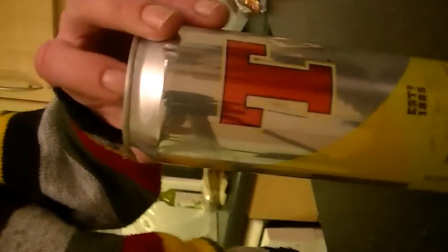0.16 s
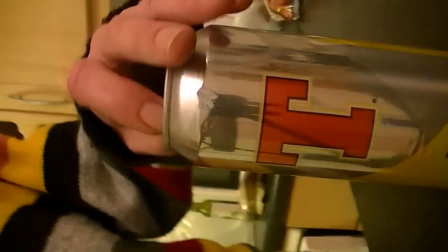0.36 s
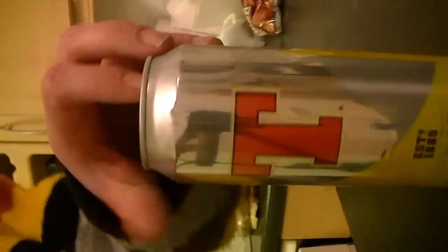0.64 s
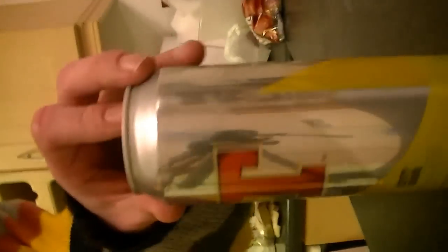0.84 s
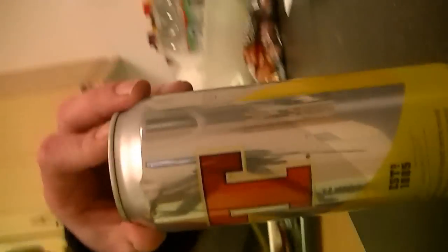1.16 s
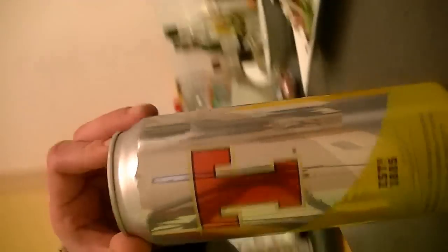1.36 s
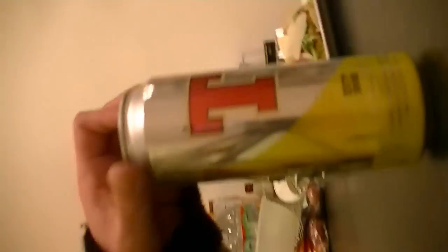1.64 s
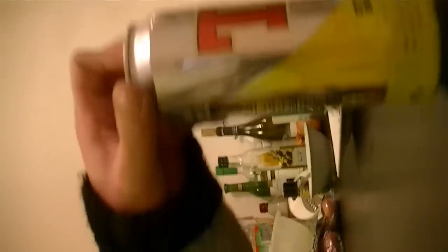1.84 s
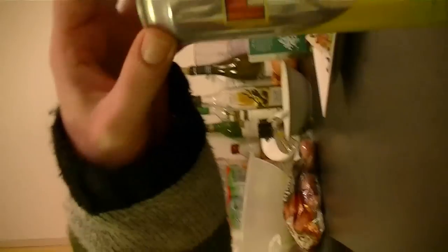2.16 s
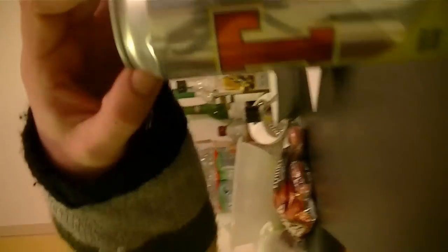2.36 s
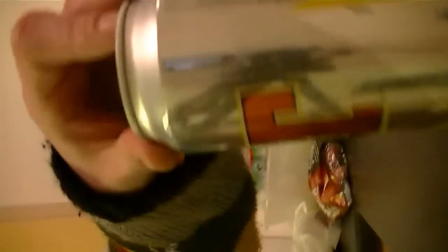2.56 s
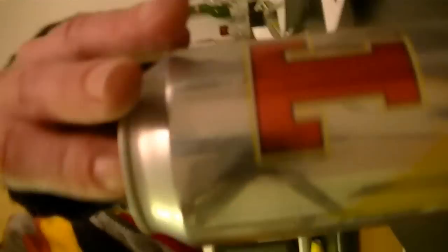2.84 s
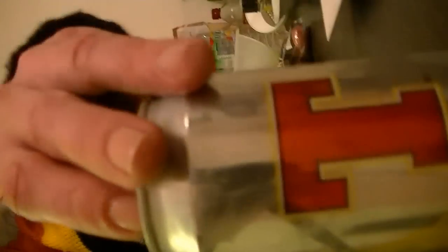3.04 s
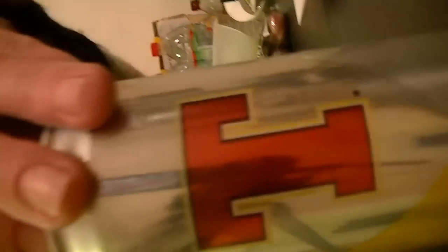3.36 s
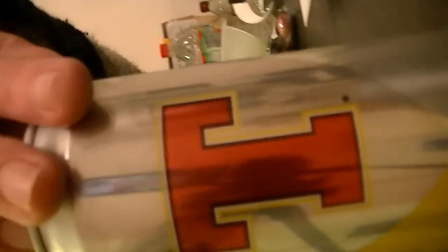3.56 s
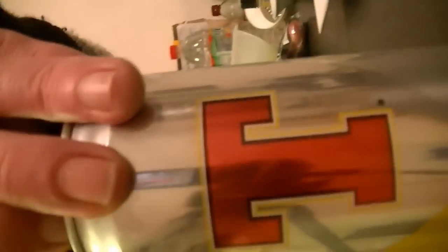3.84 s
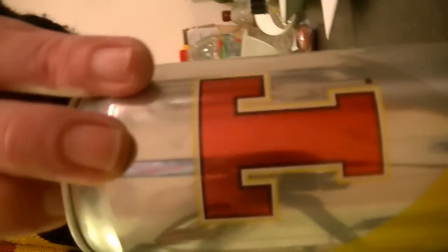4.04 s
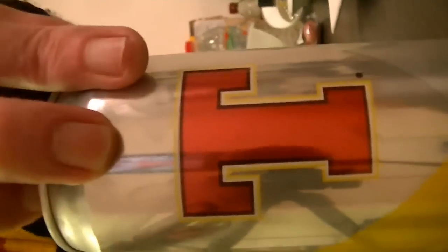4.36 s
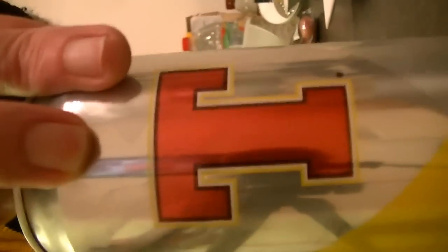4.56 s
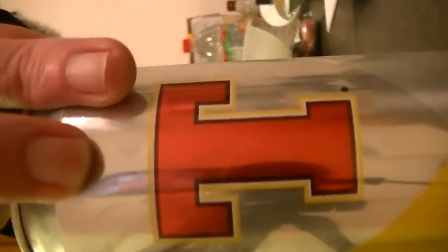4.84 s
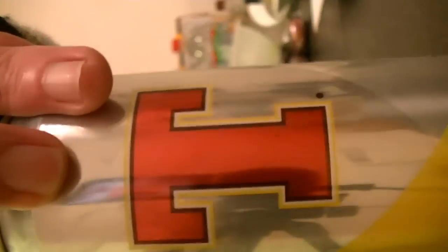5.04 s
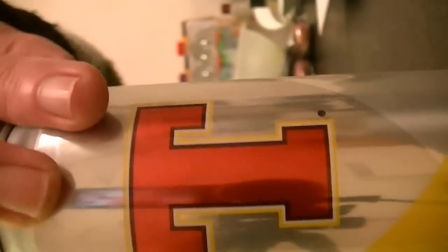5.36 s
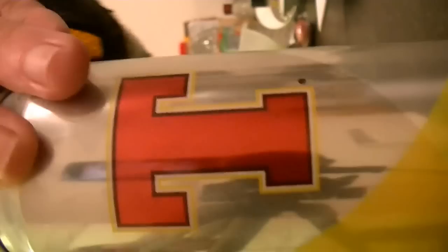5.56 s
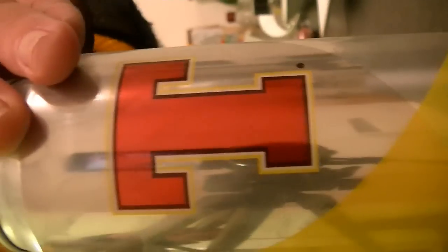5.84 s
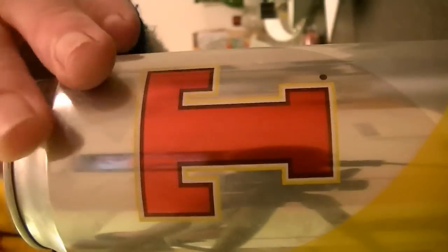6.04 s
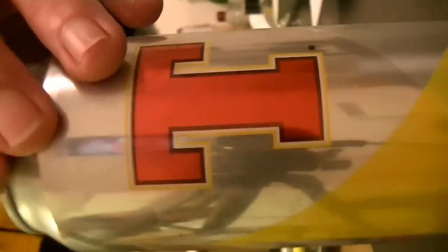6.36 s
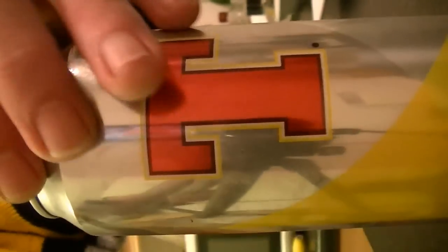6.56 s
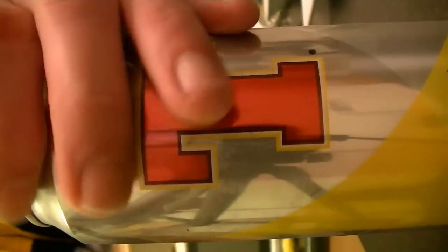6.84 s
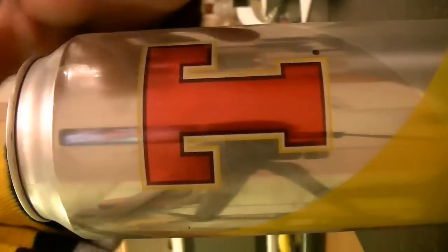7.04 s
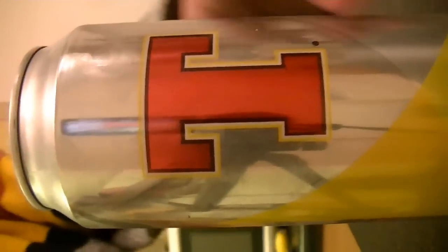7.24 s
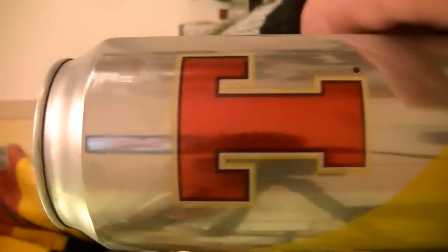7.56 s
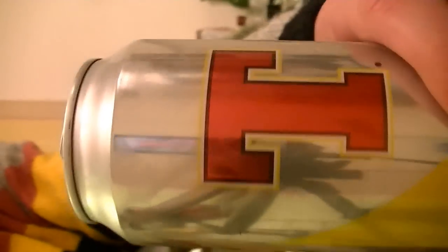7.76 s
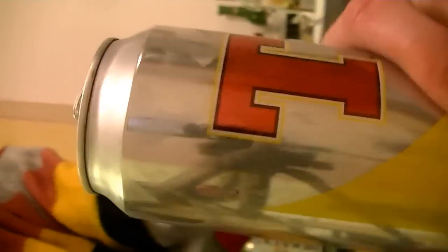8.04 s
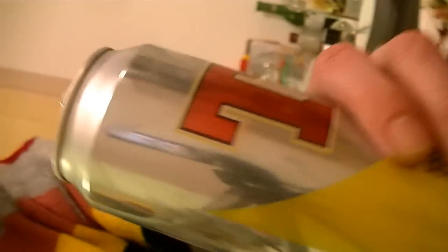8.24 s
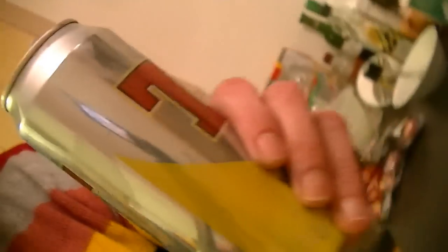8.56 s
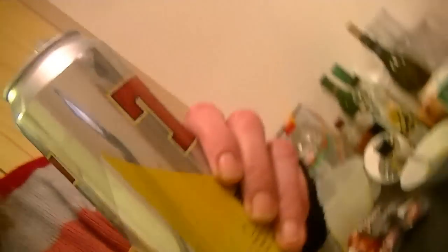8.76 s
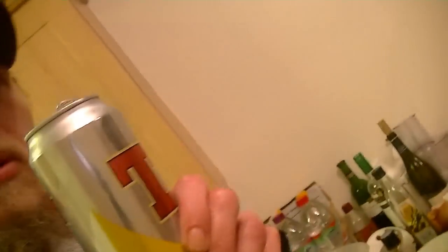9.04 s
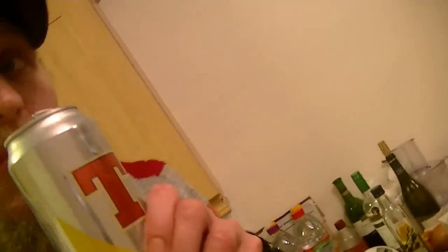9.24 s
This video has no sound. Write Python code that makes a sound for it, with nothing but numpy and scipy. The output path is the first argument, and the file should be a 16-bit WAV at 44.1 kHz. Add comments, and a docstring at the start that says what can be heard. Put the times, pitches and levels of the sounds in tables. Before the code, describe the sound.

A full aluminium drink can is tapped and turned in a hand, then cracks open with a short hiss and a sharp snap.

```python
"""A quiet kitchen: a full aluminium drink can is turned in one hand, close to the microphone.
Fingers tap, rub and grip it; the wall rings, and booms as it swings with the liquid.
The ring-pull cracks the seal, gas hisses out, the score line tears and the lid flap snaps in.
Both cracks overload the microphone. A few clicks and soft knocks follow."""
import sys
import numpy as np
from scipy import signal
from scipy.fft import rfft, irfft, next_fast_len
from scipy.io import wavfile
from scipy.ndimage import uniform_filter1d

SR = 44100
rng = np.random.default_rng(int(sys.argv[2]) if len(sys.argv) > 2 else 0)


def int16_out(signal):
    """Quantize to a 16-bit WAV file."""
    q = np.round(np.clip(np.atleast_2d(signal).T, -1, 1) * 32767)
    wavfile.write(sys.argv[1], SR, q.astype(np.int16))


N = 414099
TIME_S = np.arange(N) / SR
BAND_LIMIT_HZ = 16000

# wall swinging with the liquid: pitch_hz, level_db, t60_s
BOOM_MODES = [(279, 0, .21), (255, -10, .12), (338, -10, .18), (437, -11, .2)]
# wall of the full can: pitch_hz, level_db, t60_s
WALL_MODES = [(1125, -1, .25), (1165, -6, .2), (1745, -3, .26), (1938, 1, .16), (2230, -7, .16),
              (2350, -2, .16), (2430, -4, .17), (2830, -12, .15), (2920, -13, .14), (3310, -12, .16),
              (3950, -17, .15), (4140, -14, .15), (4430, -12, .16), (4660, -3, .15), (5210, -9, .17),
              (5950, -16, .14), (6790, -15, .12), (7780, -13, .12), (8690, -12, .12)]
# hollow of the can: pitch_hz, level_db, t60_s
HOLLOW_MODES = [(183, -14, .8), (221, -12, .6), (280, -4, .55), (443, -3, .8), (495, -3, .22),
                (678, -3, .25), (985, -1, .25)]
# thin shell's response to taps and clicks: freq_hz, gain_db
SHELL_SPECTRUM = [(300, 0), (550, 1.5), (900, 0), (2400, 2), (3400, -5), (4600, 1), (9000, 3), (14000, -3)]
# skin on metal: freq_hz, density_db
RUB_SPECTRUM = [(60, -22), (160, -3), (380, 5), (800, 0), (2500, -1), (3700, -7), (5200, -3), (9000, -10),
                (15000, -26)]


def amp(db):
    return 10 ** (np.asarray(db) / 20)


def unit_rms(x):
    return x / np.sqrt(np.mean(x ** 2) + 1e-20)


def curve_at(points, hz):
    """Linear interpolation over log frequency."""
    freq_hz, value = np.transpose(points)
    return np.interp(np.log(hz + 1), np.log(freq_hz + 1), value)


def cascade(first, second):
    """Two spectra in series."""
    hz = np.geomspace(40, BAND_LIMIT_HZ, 120)
    return np.transpose([hz, curve_at(first, hz) + curve_at(second, hz)])


def contact_spectrum(centre_hz, below_db_oct, above_db_oct):
    """A contact's spectrum falls away on both sides of its centre."""
    octaves = np.array([-6, 0, 6])
    return np.transpose([centre_hz * 2. ** octaves, octaves * [below_db_oct, 0, -above_db_oct]])


def excited(modes, spectrum, selectivity):
    """A contact favours the modes near its centre."""
    return [(hz, db + selectivity * curve_at(spectrum, hz), t60_s) for hz, db, t60_s in modes]


def add(mix, start_s, sound, room_db):
    """Adds a sound to the direct path (row 0) and the room send (row 1)."""
    part = mix[:, round(start_s * SR):][:, :len(sound)]
    part += np.outer([1, amp(room_db)], sound[:part.shape[1]])


def noise(spectrum, samples=N):
    """Steady shaped noise, rms 1."""
    size = next_fast_len(samples)
    gain = amp(curve_at(spectrum, np.fft.rfftfreq(size, 1 / SR)))
    return unit_rms(irfft(rfft(rng.standard_normal(size)) * gain, size)[:samples])


def wander(smooth_samples, samples=N):
    """Smoothed random drift, rms 1."""
    return unit_rms(uniform_filter1d(rng.standard_normal(samples), smooth_samples))


def envelope(start_s, level_db, attack_s, hold_s, t60_s):
    """Linear rise, hold, exponential decay."""
    t = TIME_S - start_s
    return np.clip(t / attack_s, 0, 1) * amp(level_db - 60 * np.maximum(t - attack_s - hold_s, 0) / t60_s)


def stream(level, spectrum, flutter_db, flutter_samples, room_db):
    """Fluttering noise, as direct path and room send."""
    sound = noise(spectrum) * level * amp(flutter_db * wander(flutter_samples))
    return np.outer([1, amp(room_db)], sound)


def burst(spectrum, level_db, t60_s, snap=0., rise_s=.0004, bass_hz=165, size=16384):
    """A blow into dense, damped modes: impulse plus dying noise. Level is energy spread over 5 ms."""
    t, hz = np.arange(size) / SR, abs(np.fft.fftfreq(size, 1 / SR))
    drive = rng.standard_normal(size) * amp(-60 * t / t60_s) * (1 - np.exp(-t / rise_s))
    bins = np.fft.fft(drive + snap * np.linalg.norm(drive) * (t == 0))
    bins /= np.sqrt(uniform_filter1d(abs(bins) ** 2, size=257, mode="wrap"))  # all bands driven alike
    radiation = hz ** 2 / np.hypot(hz ** 2, bass_hz ** 2)  # a small object radiates little bass
    log_gain = np.log(amp(curve_at(spectrum, hz)) * radiation + 1e-5)
    causal_filter = np.exp(np.conj(signal.hilbert(log_gain)))
    sound = np.fft.ifft(bins * causal_filter).real[:size * 3 // 4]
    return amp(level_db) * sound * np.sqrt(.005 * SR / np.sum(sound ** 2))


def ring(modes, level_db, rise_s, waver_rad, scatter_db=2.5, detune=.006):
    """Dying modes; the touch point varies their strength and pitch, the grip makes them waver."""
    hz, mode_db, t60_s = np.transpose(modes)[:, :, None]
    t = np.arange(SR * 3 // 4) / SR
    strength, pitch, phase = rng.standard_normal((3, len(modes), 1))
    waver = unit_rms(uniform_filter1d(rng.standard_normal((len(modes), len(t))), size=700, axis=1))
    gain = amp(mode_db + scatter_db * strength)
    angle_rad = 2 * np.pi * (hz * (1 + detune * pitch) * t + phase) + waver_rad * waver
    waves = gain * amp(-60 * t / t60_s) * np.sin(angle_rad)
    return amp(level_db) * waves.sum(0) * (1 - np.exp(-t / rise_s)) * 2 / np.linalg.norm(gain)


def room_tone(level_db=-63.3):
    """Steady kitchen background noise."""
    # background: freq_hz, density_db
    spectrum = [(20, -32), (50, -23), (100, -12), (200, -7), (320, -2), (520, -4), (900, -2), (1250, 0),
                (1650, -3), (2200, -8), (4000, -13), (8000, -17), (13000, -24), (16000, -28)]
    return amp(level_db) * noise(spectrum)


def finger_taps():
    """A tap clicks, rings the wall and makes the full can boom."""
    # finger strikes: start_s, click_db, centre_hz, below_db_oct, above_db_oct, t60_s, boom_db, wall_db
    taps = [(.0745, -41, 6660, 6, 22, .02, -74, -72), (.1425, -34, 720, 13, 10, .025, -66, -62),
            (.1475, -31, 700, 18, 6, .04, -62, -56), (.1628, -36, 1900, 2, 3, .03, -60, -55),
            (.179, -42, 1630, 2, 7, .03, -66, -62), (.6672, -20, 4550, 16, 12, .016, -43, -34),
            (1.051, -47, 2360, 4, 10, .06, -63, -57), (1.1662, -37, 2050, 18, 9.5, .025, -57, -46),
            (1.495, -38, 1000, 12, 8, .012, -70, -71), (1.4976, -33, 1000, 11, 8, .019, -63, -66),
            (1.806, -49, 5240, 2, 17, .05, -70, -70), (1.9512, -30, 1900, 2, 6, .05, -41, -43),
            (2.5758, -26, 2070, 7, 4, .016, -46, -48), (2.5788, -22, 2000, 7, 6.5, .025, -35, -37),
            (2.641, -33, 5520, 2, 9, .04, -51, -53)]
    mix = np.zeros((2, N))
    for start_s, click_db, centre_hz, below, above, t60_s, boom_db, wall_db in taps:
        contact = contact_spectrum(centre_hz, below, above)
        modes = excited(WALL_MODES, contact, selectivity=.8)
        room_db = -1.5 + .38 * (boom_db - click_db)  # a swinging wall sends more into the room
        add(mix, start_s, burst(cascade(contact, SHELL_SPECTRUM), click_db, t60_s, snap=.4), room_db)
        add(mix, start_s, ring(modes, wall_db, rise_s=.001, waver_rad=.4), room_db)
        add(mix, start_s, ring(BOOM_MODES, boom_db, rise_s=.003, waver_rad=.3), room_db=-5)
    return mix


def hand_knocks(rise_s=.002):
    """A soft blow of the hand thuds and rings the hollow of the can."""
    # dull blows: start_s, thud_db, centre_hz, below_db_oct, above_db_oct, t60_s, hollow_db
    knocks = [(.141, -41, 230, 6, 5, .14, -66), (1.485, -46, 150, 22, 12, .09, -75),
              (1.953, -37, 450, 10, 6, .2, -62), (2.579, -40, 330, 14, 8, .14, -75),
              (6.461, -47, 430, 14, 16, .14, -62), (6.9742, -35, 1000, 5, 10, .09, -48),
              (7.7425, -38.5, 480, 13, 12, .07, -63), (9.076, -45, 560, 14, 20, .045, -78)]
    mix = np.zeros((2, N))
    for start_s, thud_db, centre_hz, below, above, t60_s, hollow_db in knocks:
        contact = contact_spectrum(centre_hz, below, above)
        add(mix, start_s, burst(contact, thud_db, t60_s, rise_s=rise_s), room_db=-7)
        add(mix, start_s, ring(HOLLOW_MODES, hollow_db, rise_s, waver_rad=.25), room_db=-4)
    return mix


def rubbing(grain_db=3, flutter_db=2, trim_db=-.5, slope_db_oct=3.5):
    """Each slide swells and fades; stick-slip of the skin breaks it into grains."""
    # skin and sleeve sliding on the can: start_s, length_s, relative_db, centre_hz
    slides = [(.24, .11, -61, 2400), (.34, .12, -60, 4500), (.87, .09, -61, 2400), (1.02, .13, -58, 2700),
              (1.2, .12, -58, 2400), (1.33, .13, -60, 2800), (1.5, .46, -60.5, 2000),
              (1.75, .13, -57, 1200), (2.29, .12, -59, 2800), (2.79, .09, -61, 2400), (3.32, .18, -64, 800),
              (4.44, .19, -66, 1500), (6.31, .1, -55, 460), (7.29, .12, -55.5, 440), (7.55, .17, -59, 440)]
    mix = np.zeros((2, N))
    for start_s, length_s, relative_db, centre_hz in slides:
        samples = round(length_s * SR)
        spectrum = cascade(RUB_SPECTRUM, contact_spectrum(centre_hz, slope_db_oct, slope_db_oct))
        grains = amp(grain_db * wander(70, samples) + flutter_db * wander(900, samples))
        swell = amp(relative_db + trim_db) * np.sin(np.pi * np.arange(samples) / samples)
        add(mix, start_s, swell * grains * noise(spectrum, samples), room_db=-4)
    return mix


def grip_shifts(rise_s=.011, room_db=-5):
    """Each shift of the grip scuffs the full can and rings it softly."""
    # shifts: start_s, boom_db, wall_db
    grips = [(.264, -44, -50), (.355, -53, -50), (.762, -50, -48), (.912, -44, -51), (1.085, -49, -53),
             (1.25, -46, -50), (1.369, -53, -53), (2.135, -51, -52), (2.325, -54, -52), (2.808, -45, -45),
             (3.033, -42, -49), (3.165, -51, -56), (3.295, -53, -57), (4.485, -55, -60)]
    modes = excited(WALL_MODES, contact_spectrum(2400, 2.5, 2.5), selectivity=1)
    mix = np.zeros((2, N))
    for start_s, boom_db, wall_db in grips:
        add(mix, start_s, ring(BOOM_MODES, boom_db, rise_s, waver_rad=.4), room_db)
        add(mix, start_s, ring(modes, wall_db, rise_s, waver_rad=.5, scatter_db=4), room_db)
        scuff = burst(RUB_SPECTRUM, wall_db + 3, t60_s=.12)
        add(mix, start_s, scuff * (1 - np.exp(-TIME_S[:len(scuff)] / rise_s)), room_db)
    return mix


def sloshing(nudges=36, rate_hz=10, boom_db=-56, wall_db=-62, spread_db=2, rise_s=.011, room_db=-5):
    """The liquid nudges the wall at uneven intervals and settles once the can is still."""
    turn_start_s, turn_end_s, settle_db_per_s = .7, 3.3, 22
    mix = np.zeros((2, N))
    for k, (jitter, strength) in enumerate(rng.uniform(-1, 1, (nudges, 2))):
        start_s = turn_start_s + (k + jitter / 2) / rate_hz
        gain_db = spread_db * strength - settle_db_per_s * max(start_s - turn_end_s, 0)
        add(mix, start_s, ring(BOOM_MODES, boom_db + gain_db, rise_s, waver_rad=.35), room_db)
        add(mix, start_s, ring(WALL_MODES, wall_db + gain_db, rise_s, waver_rad=.4), room_db)
    return mix


def lid_clicks(hard_click_db=-25, hard_ring_db=-40, ring_growth=1.4, room_db=-11.5):
    """A click rings the lid, a hard one far more than a light one."""
    # nail and ring-pull clicks, led by a faint high tick just before the seal cracks: start_s, click_db,
    # centre_hz, below_db_oct, above_db_oct, t60_s
    clicks = [(4.811, -40, 5500, 6, 5, .06), (5.055, -37, 1510, 9, 5, .015),
              (5.375, -54, 8800, 24, 20, .05), (5.4645, -38, 1460, 13, 7, .015),
              (5.675, -38, 1200, 13, 5.5, .025), (5.98, -64, 8000, 6, 16, .02),
              (6.06, -62, 7000, 6, 16, .02), (6.135, -58, 7000, 6, 16, .02),
              (6.46, -24.5, 2700, 12, 14, .024), (6.7798, -35, 1870, 15, 7, .009),
              (6.9935, -42, 4050, 2, 25, .025), (8.56, -60, 6370, 8, 25, .03),
              (8.7142, -47, 12000, 13, 2, .003), (8.7157, -47, 12000, 12, 3, .007),
              (8.8848, -53, 8500, 7, 16, .023), (8.915, -56, 8000, 8, 12, .025),
              (8.955, -60, 8000, 8, 12, .025), (9.289, -53, 1270, 10, 18, .05)]
    # lid with ring-pull: pitch_hz, level_db, t60_s
    lid_modes = [(985, -2, .22), (2080, -7, .14), (2270, -6, .14), (2480, -6, .08), (2610, 0, .09),
                 (2730, 0, .2), (2820, -5, .16), (5100, -5, .15), (5700, -8, .14), (10300, -14, .08)]
    mix = np.zeros((2, N))
    for start_s, click_db, centre_hz, below, above, t60_s in clicks:
        contact = contact_spectrum(centre_hz, below, above)
        click = burst(cascade(contact, SHELL_SPECTRUM), click_db, t60_s, snap=.9, rise_s=.0005)
        add(mix, start_s, click, room_db)
        modes = excited(lid_modes, contact, selectivity=.7)
        ring_db = hard_ring_db + ring_growth * (click_db - hard_click_db)
        add(mix, start_s, ring(modes, ring_db, rise_s=.0005, waver_rad=.25), room_db)
    return mix


def gas_hiss(start_s=4.8165):
    """Gas rushes out until the pressure is spent; a faint fizz dies away after it."""
    # escaping gas: freq_hz, density_db
    spectrum = [(100, -32), (450, -21), (1100, -21), (1450, -16), (1900, -6), (2700, -6), (3800, -2),
                (5300, -3), (7200, 2), (9300, -6), (11700, -2), (13000, -8), (16000, -11)]
    rush = envelope(start_s, level_db=-15.3, attack_s=.005, hold_s=.052, t60_s=.105)
    fizz = envelope(start_s, level_db=-44, attack_s=.005, hold_s=0, t60_s=1.1)
    return stream(rush + fizz, spectrum, flutter_db=1, flutter_samples=90, room_db=-6)


def seal_crack(start_s=4.8176):
    """The seal gives way in one bright crack."""
    # crack: freq_hz, density_db
    spectrum = [(100, -42), (500, -26), (1200, -24), (2000, -6), (3000, -8), (4500, -3), (7000, 0),
                (9500, -9), (16000, -17)]
    mix = np.zeros((2, N))
    add(mix, start_s, burst(spectrum, level_db=0, t60_s=.027), room_db=-12)
    return mix


def score_tear():
    """The score line tears in jerks as the ring-pull is levered up."""
    # jerks: start_s, level_db
    jerks = [(4.889, -34), (4.911, -28), (4.943, -35)]
    # tearing metal: freq_hz, density_db
    spectrum = [(80, -32), (190, -15), (300, -2), (450, 1), (900, -5), (1350, -3), (1800, -8), (4000, -12),
                (9000, -25)]
    levels = [envelope(start_s, db, attack_s=.005, hold_s=.006, t60_s=.16) for start_s, db in jerks]
    return stream(np.max(levels, axis=0), spectrum, flutter_db=2.5, flutter_samples=120, room_db=-5)


def flap_snap(start_s=5.0671):
    """The flap snaps into the can, which rings hollow."""
    # snap: freq_hz, density_db
    spectrum = [(160, -27), (300, -21), (520, -11), (740, -1), (950, -4), (1250, -8), (1850, -1),
                (2350, -4), (2900, -11), (3700, -2), (4280, 3), (5200, -6), (6500, -5.5), (10000, -12),
                (16000, -21)]
    mix = np.zeros((2, N))
    add(mix, start_s, burst(spectrum, level_db=1, t60_s=.044), room_db=-11.5)
    add(mix, start_s, ring(HOLLOW_MODES, level_db=-45, rise_s=.004, waver_rad=.25), room_db=-4)
    return mix


def kitchen_reverb(send, build_s=.008):
    """Dense reflections off hard surfaces build up, then die band by band."""
    # room decay: freq_hz, t60_s
    decay = [(150, .9), (280, .95), (700, .68), (1500, .74), (4000, .64), (7000, .53), (11000, .43),
             (16000, .33)]
    # room response: freq_hz, relative_db
    spectrum = [(100, -4), (300, 1), (1000, .5), (2000, .5), (4000, -1.5), (8000, -2.5), (16000, -6)]
    build_up = 1 - np.exp(-(TIME_S[:SR] / build_s) ** 2)
    reflections = rng.standard_normal(SR) * (rng.random(SR) < .2) * build_up
    hz, t, bands = signal.stft(reflections, SR, nperseg=256)
    bands *= amp(-60 * t / curve_at(decay, hz)[:, None] + curve_at(spectrum, hz)[:, None])
    tail = signal.istft(bands, SR, nperseg=256)[1]
    mid_gain = np.sqrt(np.mean(abs(rfft(tail, SR)[500:5000]) ** 2))  # 500-5000 Hz
    return signal.fftconvolve(send, tail / mid_gain)[:N]


def scene():
    """Can, reflections and background, alike in both channels."""
    handling = finger_taps() + grip_shifts() + sloshing() + rubbing()
    opening = gas_hiss() + score_tear() + seal_crack() + flap_snap()
    direct, send = handling + opening + lid_clicks() + hand_knocks()
    sound = direct + kitchen_reverb(send) + room_tone()
    return np.array([sound, sound])


def record(dry, ceiling=.88, low_cut_hz=70):
    """One microphone: soft overload on the two cracks, low cut, band limit."""
    clipped = dry / (1 + (dry / ceiling) ** 4) ** (1 / 4)
    thinned = signal.lfilter(*signal.butter(1, low_cut_hz, "high", fs=SR), clipped)
    low_pass = signal.firwin(511, BAND_LIMIT_HZ, window=("kaiser", 9), fs=SR)
    return signal.oaconvolve(thinned, low_pass[None], "same", axes=1)


dry = scene()
out = record(dry)
int16_out(out)
```